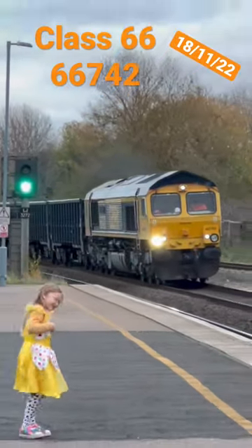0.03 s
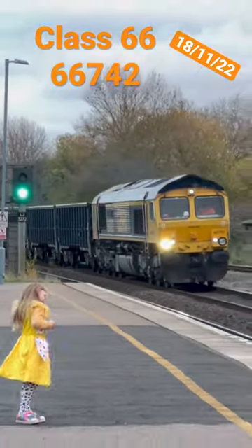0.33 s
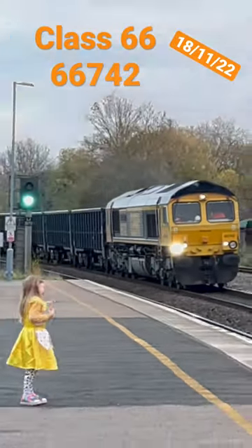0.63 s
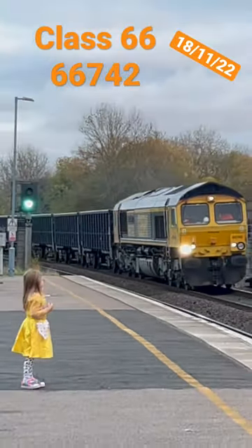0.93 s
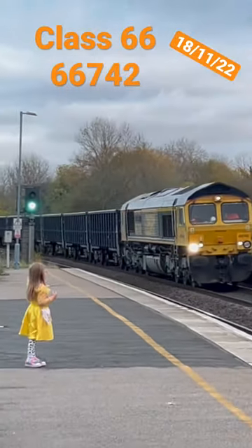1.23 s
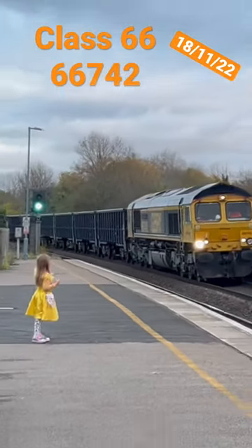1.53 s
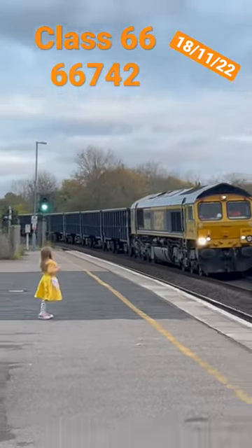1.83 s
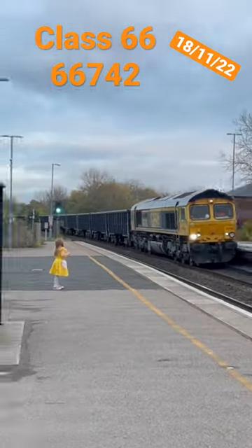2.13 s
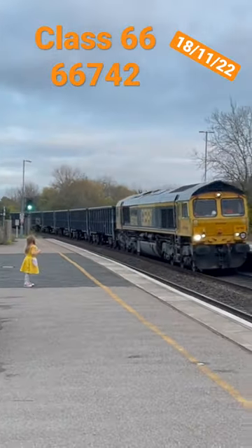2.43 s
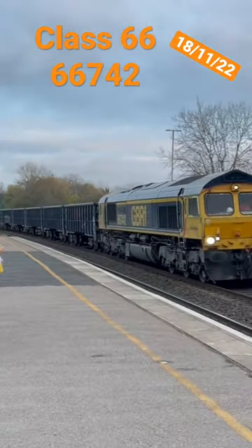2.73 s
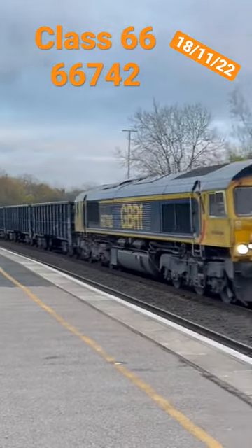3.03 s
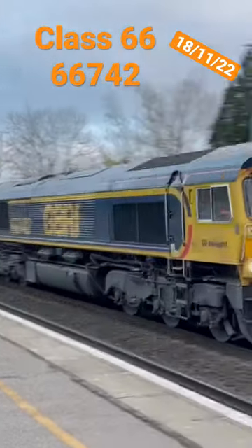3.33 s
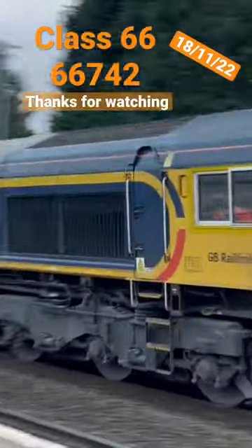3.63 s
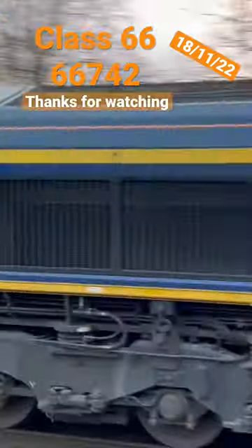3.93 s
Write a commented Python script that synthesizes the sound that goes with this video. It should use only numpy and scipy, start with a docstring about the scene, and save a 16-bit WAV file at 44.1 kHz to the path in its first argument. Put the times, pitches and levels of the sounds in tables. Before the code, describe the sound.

A diesel freight train rumbles toward the microphone on a platform, with a few soft wind bumps. Exhaust throb, fan drone and a wavering gear whine grow loud, sinking slightly as the engine draws level with hissing wheels.

```python
"""A low rumble and faintly singing rails: a diesel freight locomotive is pulling towards a platform.
The throb of its exhaust, the drone of its spinning fans and the beating whine of its gears swell
over the roar of engine and wheels, and sink in pitch as it draws level with the microphone.
A little wind bumps the microphone, and at the end the wheels hiss close by."""
import sys
import numpy as np
from scipy import signal
from scipy.fft import rfft, irfft
from scipy.io import wavfile
from scipy.ndimage import uniform_filter1d, minimum_filter1d

SR = 44100
rng = np.random.default_rng(int(sys.argv[2]) if len(sys.argv) > 2 else 0)


def master(y):
    """Save y as 16-bit WAV."""
    cut = np.clip(np.atleast_2d(y).T, -1, 1)
    pcm = np.round(cut * 32767)  # scale
    wavfile.write(sys.argv[1], SR, pcm.astype(np.int16))


N = 176400
T, HZ = np.arange(N) / SR, np.fft.rfftfreq(N, 1 / SR)

TRAIN_M_S, SOUND_M_S, TRACK_DISTANCE_M = 16, 343, 5.2
CRANK_HZ = 15.33  # engine turns per second
FANS_PASS_S, EXHAUST_PASS_S = 3.92, 3.99  # when each is nearest
WIDENS_S = (1.3, 3.1)  # over this span the treble widens and the exhaust tones grow firm
# How alike left and right are: always for tones, later on for noise.
# Each row: frequency in Hz, likeness from 0 to 1.
LIKENESS = [(50, 0.93), (150, 1), (350, 0.9), (600, 1), (1000, 0.79), (1450, 0.13), (1900, 0.93), (2300, 1),
            (3000, 0.66), (3500, 0.67), (4300, 0.96), (5900, 1), (6800, 0.9), (8800, 0.35), (9200, 1),
            (10800, 1), (11200, 0.73), (12200, .7), (12600, 1), (15000, 1)]


def amp(db):
    """Turn decibels into a gain."""
    return 10 ** (np.asarray(db) / 20)


def unit(x):
    """Scale a signal to an average power of 1."""
    return x / np.sqrt(np.mean(abs(x) ** 2) + 1e-20)


def over_pitch(points, hz=HZ):
    """Join a table's rows smoothly along a logarithmic frequency axis."""
    f, value = np.transpose(points)
    return np.interp(np.log(hz + 1), np.log(f), value)


def over_time(points, column=1):
    """Join a table's rows with straight lines over time."""
    rows = np.array(points)
    return np.interp(T, rows[:, 0], rows[:, column])


def swell(peak_s, length_s):
    """A short bell-shaped rise and fall."""
    return np.exp(-2 * ((T - peak_s) / length_s) ** 2)


def drift(rate_hz):
    """A random wander, mostly slower than rate_hz, in complex numbers (size and phase)."""
    steps, steps_per_s = 4096, 800
    f = np.fft.fftfreq(steps, 1 / steps_per_s)
    chance = rng.standard_normal(steps) + 1j * rng.standard_normal(steps)
    wander = np.fft.ifft(chance / (1 + (f / rate_hz) ** 2))
    return np.interp(T, np.arange(steps) / steps_per_s, unit(wander))


def stereo_pair(a, b, likeness):
    """Mix two unrelated signals into a left and a right that are partly alike."""
    return np.array([a, likeness * a + np.sqrt(1 - likeness ** 2) * b])


def noise(spectrum):
    """Stereo noise of power 1. Each row of its spectrum: frequency in Hz, relative level in dB."""
    # How alike left and right are at the start: the treble is narrow, then widens.
    likeness_early = [(50, 0.9), (350, 0.89), (700, 0.65), (1050, .45), (1600, 0.98), (2300, 1), (7400, 1),
                      (8500, 0.26), (9300, 0.96), (10800, 0.97), (11800, 0.33), (12700, 0.89)]  # Each row: frequency in Hz, likeness from 0 to 1.
    a, b = rfft(rng.standard_normal((2, N))) * amp(over_pitch(spectrum))
    early = irfft(stereo_pair(a, b, over_pitch(likeness_early)), N)
    late = irfft(stereo_pair(a, b, over_pitch(LIKENESS)), N)
    return unit(early + np.interp(T, WIDENS_S, [0, 1]) * (late - early))


def tone(hz, scatter, flutter_hz):
    """A direct tone plus fluttering reflections off ground and platform; scatter is their share."""
    reflections = stereo_pair(drift(flutter_hz), drift(flutter_hz), over_pitch(LIKENESS, hz.mean()))
    paths = np.sqrt(1 - scatter) + np.sqrt(scatter) * reflections
    cycles = np.cumsum(hz) / SR + rng.random()
    return np.sqrt(2) * (paths * np.exp(2j * np.pi * cycles)).real


def passing(pass_s):
    """How much an approach raises the pitch (Doppler), and how side-on the source is, from 0 to 1."""
    ahead_m = TRAIN_M_S * (pass_s - T)
    distance_m = np.hypot(ahead_m, TRACK_DISTANCE_M)
    doppler = 1 / (1 - ahead_m / distance_m * TRAIN_M_S / SOUND_M_S)
    return doppler, (TRACK_DISTANCE_M / distance_m) ** 1.44


def rumble():
    """The rolling train makes a deep noise that grows as it nears."""
    spectrum = [(15, -55), (30, -25), (45, -3.5), (62, 1), (90, 1), (130, -7), (180, -15.5), (300, -32),
                (600, -59), (3000, -93)]  # Each row: frequency in Hz, relative level in dB.
    loudness = [(0, -32.5), (.7, -28.5), (1.2, -31), (1.6, -26), (2.2, -29), (2.7, -25.5), (3.3, -25.5),
                (3.65, -23), (4, -16.5)]  # Each row: time in seconds, level in dB.
    return noise(spectrum) * amp(over_time(loudness))


def singing_rails():
    """The rails ring ahead of the train: almost steady noise with several peaks in pitch."""
    spectrum = [(300, 13), (520, 7.5), (850, 4.5), (1200, 8), (1500, 5), (1850, -1), (2150, 8),
                (2450, -0.5), (2900, -10), (3200, -1), (3500, -11), (5800, -44), (6500, -21.5), (7050, -6),
                (7600, -20), (9500, -32), (11500, -15.5), (15000, -40)]  # Each row: frequency in Hz, relative level in dB.
    loudness = [(0, -38.5), (.7, -37.5), (1.5, -37), (2.4, -36.5), (4, -38)]  # Each row: time in seconds, level in dB.
    return noise(spectrum) * amp(over_time(loudness))


def exhaust_throb():
    """Tones at multiples of the crank speed, broken up from far off and firm alongside."""
    # Each row: multiple of the crank speed, relative level in dB from ahead, then from the side.
    harmonics = [(3, -42, -42), (3.5, -34, -42), (4, -28, -33), (5, -31, -33), (6, -34, -21), (7, -43, -30),
                 (8, -23, -16), (10, -38, -39), (11, -40, -39), (12, -31, -31), (14, -40, -37),
                 (19, -35, -33)]
    loudness = [(0, -20.5), (1.8, -13.5), (2.25, -11.5), (2.6, -9.5), (3.1, 0), (3.45, -1.5), (4, -1)]  # Each row: time in seconds, gain in dB.
    doppler, side = passing(EXHAUST_PASS_S)
    scatter = np.interp(T, WIDENS_S, [.5, .05])
    throb = 0
    for multiple, ahead_db, side_db in harmonics:
        gain = amp(ahead_db + (side_db - ahead_db) * side)
        throb += gain * tone(multiple * CRANK_HZ * doppler, scatter, flutter_hz=5)
    return amp(over_time(loudness)) * throb


def exhaust_gas():
    """Rushing gas, pulsed by the engine's eight firings per turn."""
    spectrum = [(60, -17), (120, -11.5), (180, 2.5), (250, -2.5), (350, -2.5), (430, -11), (700, -28),
                (2000, -56), (8000, -100)]  # Each row: frequency in Hz, relative level in dB.
    loudness = [(0, -48), (.6, -48.5), (1.3, -35), (1.9, -36), (2.4, -29.5), (3, -25.5), (3.5, -24.5),
                (4, -25)]  # Each row: time in seconds, level in dB.
    doppler, _ = passing(EXHAUST_PASS_S)
    firings = np.cumsum(8 * CRANK_HZ * doppler) / SR
    pulse = 1 + .82 * np.cos(2 * np.pi * firings)
    return noise(spectrum) * amp(over_time(loudness) + 3.1 * drift(22).real) * pulse


def fans():
    """Spinning blades make rough blower tones and two cooling-fan drones that swell and fade."""
    # Each row: pitch at rest in Hz, relative dB from ahead, then from the side, reflected share.
    blade_tones = [(291, -37, -46, .3), (453, -39, -45, 0.1), (479, -38.5, -37, 0.7),
                   (514, -33.5, -40, 0.47), (526.3, -45.5, -34, 0.9), (616.5, -51, -29, 0.8),
                   (720, -34, -36, 0.66), (736, -47, -32.5, 0.7), (803, -39.5, -39, .6),
                   (1215, -40, -42.5, 0.6)]
    blade_loudness = [(0, -21.5), (.6, -15), (1, -12.5), (1.5, -11), (2, -6.5), (2.6, -1.5), (3.05, -0.5),
                      (3.3, 5), (3.55, 3), (3.72, 7), (3.85, 5.5), (4, 8.5)]  # Each row: time in seconds, gain in dB.
    # Each row: pitch at rest in Hz, then a list of pairs of time in seconds and level in dB.
    drone_tones = [(242, [(0, -46), (.6, -44), (1, -35), (1.4, -39), (2.2, -34), (2.6, -25), (2.8, -28),
                   (3.15, -26), (3.47, -20), (3.7, -24), (4, -25)]), (361.5, [(0, -41), (.16, -36.5),
                   (.9, -41), (1.1, -37.5), (1.65, -38), (1.8, -32), (2.25, -28.5), (2.75, -28),
                   (2.88, -23.5), (3.15, -26), (3.4, -20.5), (3.62, -20.5), (3.75, -35), (3.92, -19),
                   (4, -20.5)])]
    doppler, side = passing(FANS_PASS_S)
    blades = drones = 0
    for hz, ahead_db, side_db, scatter in blade_tones:
        gain = amp(ahead_db + (side_db - ahead_db) * side)
        blades += gain * tone(hz * doppler, scatter, flutter_hz=hz * .025)
    for hz, loudness in drone_tones:
        drones += amp(over_time(loudness)) * tone(hz * doppler, scatter=.12 + .25 * side, flutter_hz=16)
    return amp(over_time(blade_loudness)) * blades + drones


def gears():
    """Three close gear whines beat together, each with a flickering octave that carries best ahead."""
    axles = [
        [(0, 1042, -37), (.45, 1040, -39.5), (1.1, 1046, -39), (1.45, 1053, -33.5), (2.1, 1050, -33),
         (2.45, 1061, -30), (3, 1056, -26.5), (3.45, 1050, -24), (3.7, 1058, -27), (3.88, 1052, -18.5),
         (4, 1049, -23.5)],
        [(0, 1071, -45.5), (.5, 1069, -33), (1, 1079, -32.5), (1.5, 1084, -34), (1.8, 1088, -33),
         (2.55, 1091, -30), (2.78, 1095, -24.5), (3.08, 1100, -31), (3.42, 1087, -16.5), (3.7, 1081, -22),
         (3.85, 1076, -29), (4, 1070, -22)],
        [(0, 1012, -46.5), (1.3, 1012, -41), (1.85, 1017, -44), (2.15, 1015, -40), (2.6, 1022, -44),
         (3.55, 1032, -37.5), (4, 1006, -42)],
    ]  # One list per axle. Each row: time in seconds, pitch in Hz, level in dB.
    octave_gains = [-10, -10.5, -12]  # One per axle: the octave's gain in dB, heard from ahead.
    # Brief flares. Each row: peak time and length in seconds, lift of whine and of octave in dB.
    flares = [(.68, .05, -1, 5), (1.39, .016, 8, 0), (1.81, .016, 6, 0), (1.852, .014, 8, 0)]
    _, side = passing(FANS_PASS_S)
    flare_db, octave_flare_db = sum(np.outer(lifts, swell(s, length)) for s, length, *lifts in flares)
    surge_db = 1.6 * drift(14).real
    out = 0
    for axle, octave_db in zip(axles, octave_gains):
        hz = over_time(axle) * (1 + .0016 * drift(6).real)
        whine = tone(hz, scatter=.42, flutter_hz=19) * amp(flare_db + surge_db)
        octave = tone(2 * hz, scatter=.6, flutter_hz=34) * amp(2.2 * drift(16).real)
        octave *= amp(octave_db + octave_flare_db - 5.6 * side)
        out += amp(over_time(axle, column=2)) * (whine + octave)
    return out


def engine_roar():
    """The engine's mid-pitched noise wavers slightly and peaks just before it draws level."""
    spectrum = [(100, -23), (280, -19), (450, -3), (650, 0.5), (800, 2), (950, 1.5), (1150, 1.5),
                (1400, -14), (2500, -25.5), (6000, -41)]  # Each row: frequency in Hz, relative level in dB.
    loudness = [(0, -39.5), (1, -34), (1.6, -33.5), (2.3, -30), (3, -26), (3.5, -18.5), (3.85, -20),
                (4, -23.5)]  # Each row: time in seconds, level in dB.
    return noise(spectrum) * amp(over_time(loudness) + .72 * drift(25).real)


def wheels():
    """Rolling wheels make a bright, flickering rush that grows as they near."""
    spectrum = [(400, -26.5), (1000, -8.5), (1500, 0), (1900, 1), (2150, -2), (2600, -1.5), (3000, -2.5),
                (3400, -6.5), (4100, -8.5), (5000, -11.5), (7000, -16.5), (8700, -19), (10000, -27),
                (11500, -23), (13000, -27), (15000, -44)]  # Each row: frequency in Hz, relative level in dB.
    loudness = [(0, -46.5), (1, -41), (1.5, -39), (2.1, -35), (2.7, -31.5), (3.1, -26.5), (3.45, -22),
                (3.82, -21), (4, -22)]  # Each row: time in seconds, level in dB.
    return noise(spectrum) * amp(over_time(loudness) + .94 * drift(30).real)


def wind():
    """Short, low puffs of air bump the microphone, each at its own pitch."""
    bumps = [(0.02, 0.022, -21.5, 115), (.31, .04, -26, 60), (.715, .025, -26, 120),
             (0.805, .04, -21.5, 132), (1.0, .025, -25, 85), (1.341, .042, -16.5, 74),
             (1.482, 0.024, -20, 130), (1.775, 0.036, -15.8, 88), (2.7, .07, -18, 62),
             (3.24, .04, -18.5, 62)]  # Each row: peak time and length in seconds, level in dB, centre in Hz.
    spectrum = [(.2, -42), (.55, -14), (1, 1), (1.5, -10), (2.3, -15.5), (3.5, -28), (6, -46), (14, -79),
                (55, -110)]  # Each row: multiple of the centre frequency, relative level in dB.
    out = 0
    for peak_s, length_s, db, centre_hz in bumps:
        air = noise([(centre_hz * multiple, band_db) for multiple, band_db in spectrum])
        shape = swell(peak_s, length_s)
        strength = np.sqrt(np.average(air.mean(0) ** 2, weights=shape ** 2))
        out += amp(db) * shape * air / strength
    return out


def close_hiss():
    """The hiss of wheel on rail, heard only from close by."""
    spectrum = [(1200, -35), (2500, -8), (3800, 6), (5500, -6), (8000, -17), (10000, -28), (15000, -47)]  # Each row: frequency in Hz, relative level in dB.
    return noise(spectrum) * amp(-32) * swell(peak_s=3.85, length_s=.49)


def place_in_stereo(train):
    """Left and right differ in level and phase; the sound swings aside as the train nears."""
    balance = [(50, .7), (300, 1.2), (400, 2.2), (550, 5), (1080, 4.2), (1600, 2.3), (2300, -1.3),
               (3100, .3), (4500, 2), (5400, 2.7), (7000, .5), (9000, 0)]  # Each row: frequency in Hz, level of left over right in dB.
    lead_base = [(50, 0), (250, .05), (500, .45), (1200, .4), (1600, -.1), (3000, .05), (7200, 0),
                 (8500, -.9), (9200, -3.05), (10800, -3.25), (11800, -4.8), (12600, -6.25)]  # Each row: frequency in Hz, phase lead of left over right in radians.
    lead_extra = [(50, -0.18), (500, 0.58), (850, 0.94), (1080, 0.55), (1300, 2), (1600, -1), (2050, -1.5),
                  (2400, 0.4), (3200, 1.37), (4000, 0.98), (5200, 1.1), (5800, -1.9), (6600, -0.27)]  # Each row: frequency in Hz, lead added by the swing in radians.
    hz, t, (left, right) = signal.stft(train, SR, nperseg=1024, noverlap=768, boundary="odd")
    swing = np.interp(t, (2.045, 2.19), [0, 1])
    lead = over_pitch(lead_base, hz)[:, None] + over_pitch(lead_extra, hz)[:, None] * swing
    half = amp(over_pitch(balance, hz)[:, None] / 2) * np.exp(.5j * lead)  # each side takes half
    _, placed = signal.istft(np.array([left * half, right / half]), SR, nperseg=1024, noverlap=768)
    return placed[:, :N]


def scene():
    """The approaching train in stereo, with wind on the microphone."""
    tones = exhaust_throb() + fans() + gears()
    noises = rumble() + exhaust_gas() + engine_roar() + wheels() + close_hiss() + singing_rails()
    return place_in_stereo(tones + noises) + wind()


def record(dry):
    """A fast limiter turns down the loudest peaks, then a filter cuts the highest treble."""
    ceiling, limiter_s, cutoff_hz = .95, .004, 15100
    size = round(limiter_s * SR)
    safe_gain = ceiling / np.maximum(abs(dry).max(0), ceiling)
    limited = dry * uniform_filter1d(minimum_filter1d(safe_gain, 2 * size), size)
    low_pass = signal.firwin(511, cutoff_hz, window=("kaiser", 9), fs=SR)
    return signal.oaconvolve(limited, low_pass[None], "same")


dry = scene()
out = record(dry)
master(out)
```